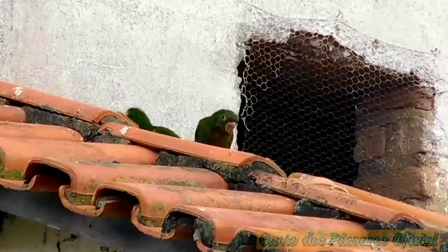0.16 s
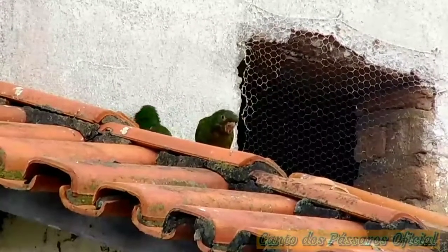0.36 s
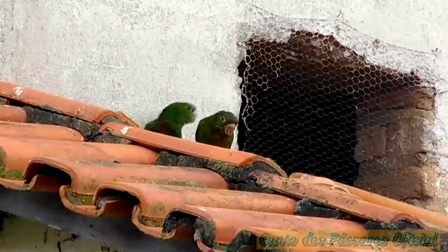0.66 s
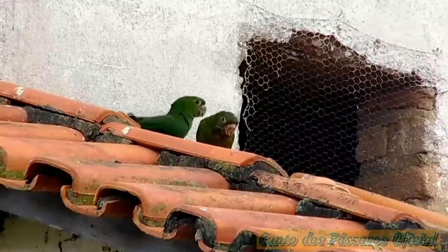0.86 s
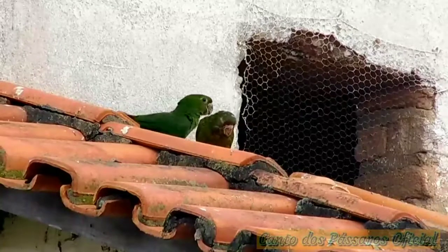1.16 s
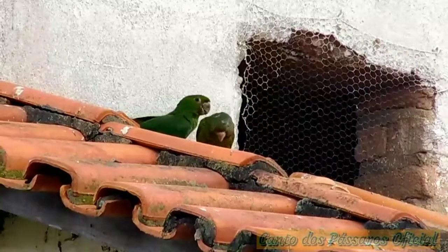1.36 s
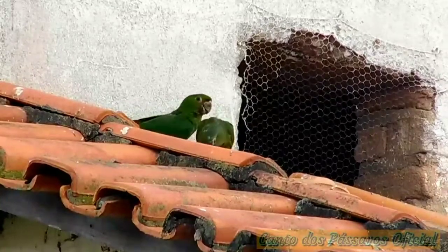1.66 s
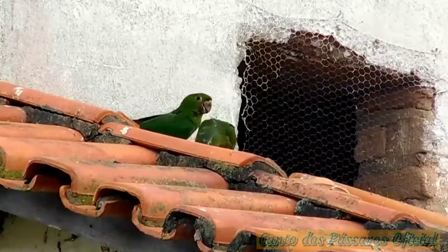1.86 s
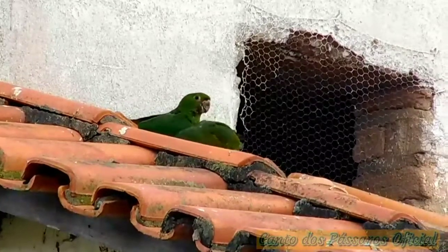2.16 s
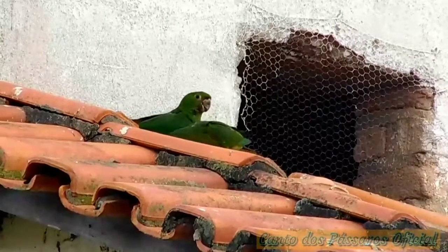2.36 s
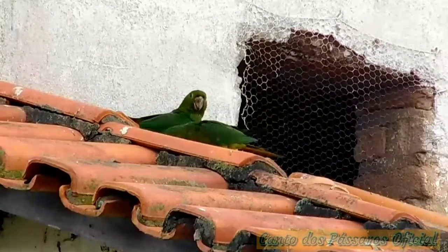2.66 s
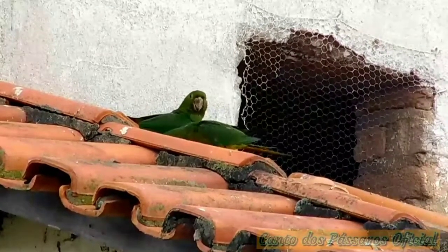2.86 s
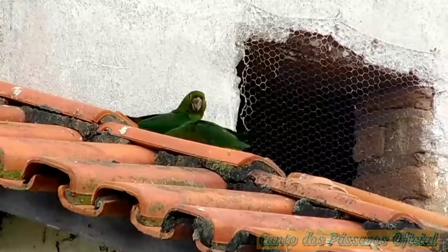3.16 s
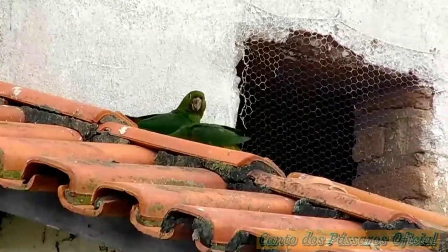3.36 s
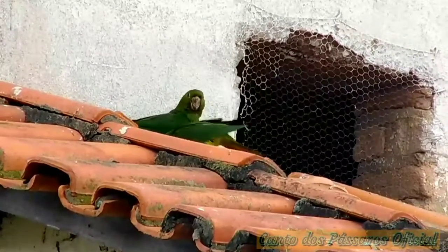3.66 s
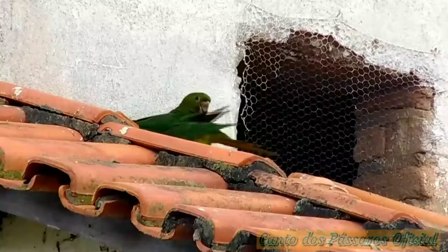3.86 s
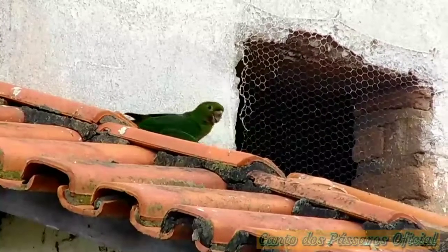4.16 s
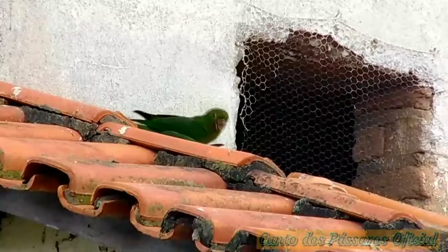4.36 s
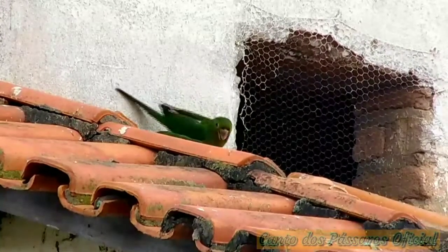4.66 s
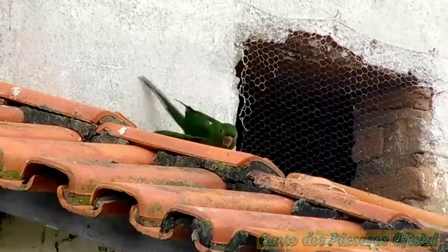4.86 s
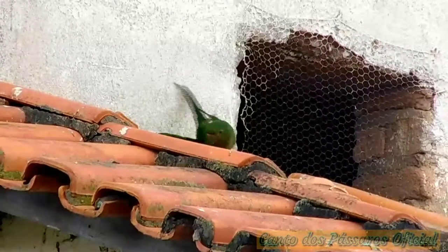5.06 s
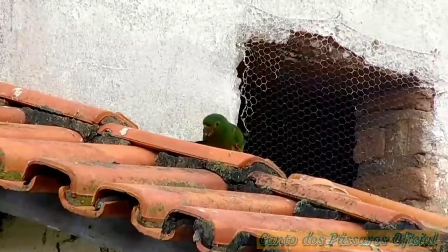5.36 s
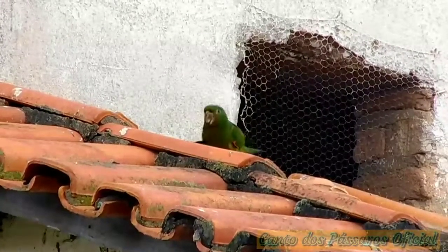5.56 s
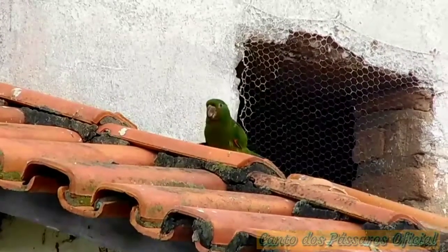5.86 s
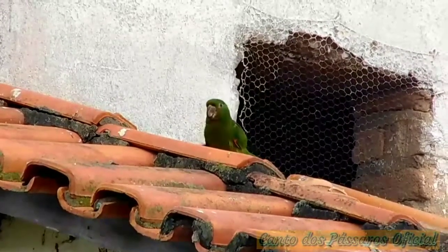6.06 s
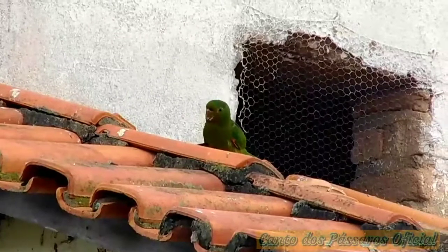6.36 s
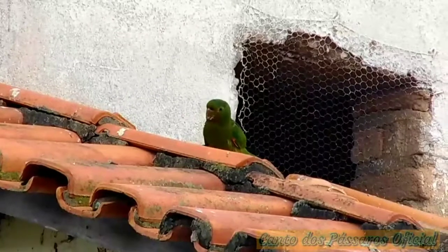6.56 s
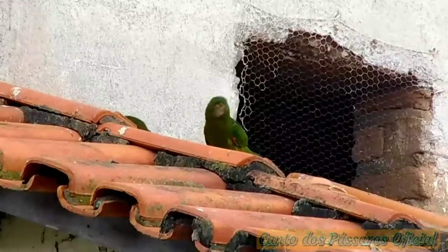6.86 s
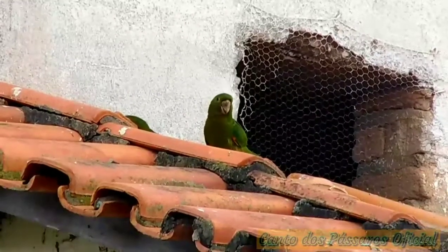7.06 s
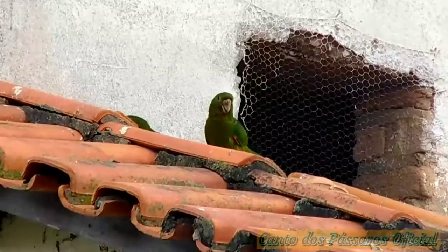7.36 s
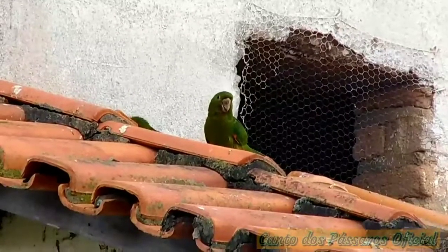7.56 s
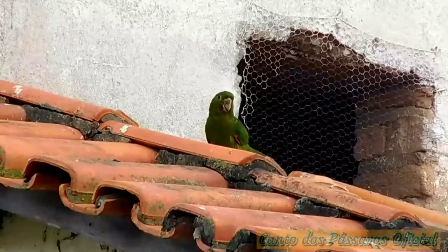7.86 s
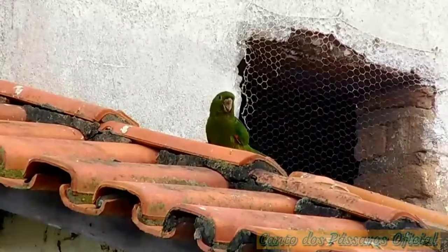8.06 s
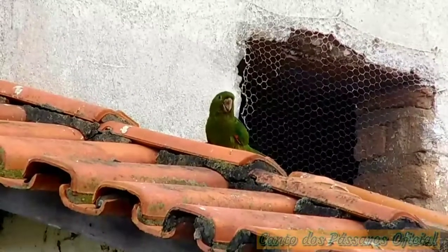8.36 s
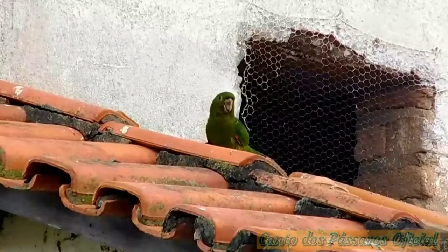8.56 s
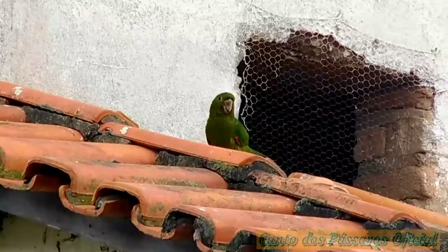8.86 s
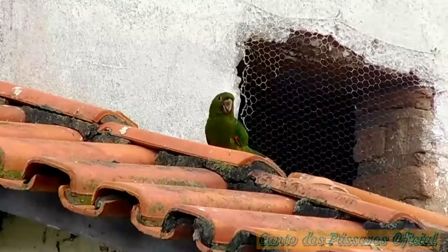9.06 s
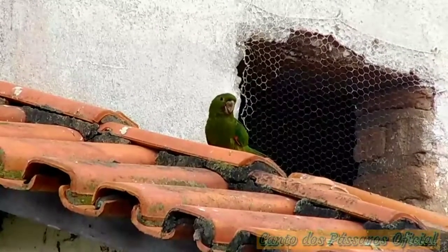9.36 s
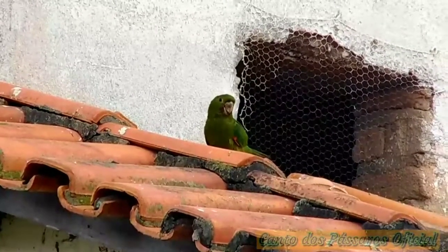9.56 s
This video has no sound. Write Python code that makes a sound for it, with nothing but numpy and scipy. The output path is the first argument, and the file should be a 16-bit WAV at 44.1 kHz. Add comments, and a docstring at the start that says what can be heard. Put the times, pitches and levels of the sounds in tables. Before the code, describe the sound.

Two parakeets squabble outdoors on a roof, slightly to the right of the microphone. A brief screech opens, then a pause reveals faint chirps from a small bird and four distant hammer blows on metal. A long bout of rapid squawks, rasps, squeals and thin whistles follows, and one last short screech comes after a gap. Walls add a light echo over a low town hum.

```python
"""Parakeets squabbling on a roof

Two parakeets screech in quick bouts, a little to the right; roof tiles and yard walls answer.
The voice flips between a gliding squawk, a rattling rasp, a falling squeal and a thin whistle.
Squawks and rasps are brighter the louder they are, and the throat's resonances rise with the pitch.
Far off, over the hum of a town, a small bird chirps and someone hammers on metal."""
import sys
import numpy as np
from scipy import signal
from scipy.fft import rfft, irfft, next_fast_len
from scipy.io import wavfile
from scipy.ndimage import map_coordinates

SR = 44100
rng = np.random.default_rng(int(sys.argv[2]) if len(sys.argv) > 2 else 0)


def dump(signal):
    """Clip the signal to [-1, 1] and save it as 16-bit WAV at the path in sys.argv[1]."""
    limited = np.clip(np.atleast_2d(signal).T, -1, 1)
    pcm = np.round(limited * 32767).astype(np.int16)
    wavfile.write(sys.argv[1], SR, pcm)


N = 428211
TOP_HZ = 14500
USUAL_DB, USUAL_HZ = -16, 710  # an ordinary low note
SQUAWK_ROUGH, RASP_ROUGH, SQUEAL_ROUGH, WHISTLE_ROUGH = .31, .62, .37, .3  # 0 clean, 1 all noise


def amp(db):
    """Decibels to gain."""
    return 10 ** (np.asarray(db) / 20)


def unit(x):
    """x at rms 1."""
    return x / np.sqrt(np.mean(x ** 2) + 1e-20)


def along(points, hz):
    """An EQ curve: (frequency, value) points read on a log axis."""
    f, v = np.transpose(points)
    return np.interp(np.log(hz + 1), np.log(f + 1), v)


def over_time(points, s):
    """An automation curve: (time, value) points joined by straight lines."""
    return np.interp(s, *np.transpose(points))


def wobble(rate, size):
    """A smooth random curve with rate knots a second."""
    return map_coordinates(rng.standard_normal(size // 10), [np.arange(size) * rate / SR], mode="mirror")


def filtered(x, response):
    """x through a filter whose gain is response(Hz)."""
    size = x.shape[-1]
    m = next_fast_len(2 * size)
    return irfft(rfft(x, m) * response(np.fft.rfftfreq(m, 1 / SR)), m)[..., :size]


def causal(db):
    """The minimum-phase response with these levels: it rings after a pulse, never before."""
    cepstrum = irfft(np.log(amp(db)))
    half = len(cepstrum) // 2
    return np.exp(rfft(np.r_[cepstrum[0], 2 * cepstrum[1:half]], 2 * half))


def add(track, s, x):
    """Mix x into the track at time s."""
    part = track[..., max(round(s * SR), 0):][..., :x.shape[-1]]
    part += x[..., :part.shape[-1]]


def panned(x, left_db, lead_s=0):
    """Make a stereo sound left_db(Hz) louder, and lead_s earlier, on the left."""
    sign = np.array([[.5], [-.5]])
    return filtered(x, lambda hz: amp(sign * left_db(hz)) * np.exp(2j * np.pi * hz * sign * lead_s))


# tone of the town bed: (frequency [Hz], gain [dB])
TOWN_EQ = [(25, -3.5), (180, 0), (560, -9), (850, -6), (4000, -19), (14000, -29.5)]
def town(level_db=-42.5):
    """A steady hum, nearly mono in the bass and wide in the treble."""
    mid, side = filtered(rng.standard_normal((2, N)), lambda hz: amp(along(TOWN_EQ, hz)))
    side = filtered(side, lambda hz: amp(along([(150, -13), (3000, -2)], hz)))
    return amp(level_db) * unit(np.array([mid + side, mid - side]))


# fader ride on the traffic: (time [s], level [dB])
TRAFFIC_FADER = [(0, -47), (1, -59), (6.3, -62), (7.7, -46), (9.7, -45.5)]
def traffic(corner_hz=170, side_db=-12):
    """Far traffic rumbles in the bass, sinking away early and swelling toward the end."""
    mid, side = filtered(rng.standard_normal((2, N)), lambda hz: 1 / (1 + (hz / corner_hz) ** 2))
    side *= amp(side_db)
    level_db = over_time(TRAFFIC_FADER, np.arange(N) / SR)
    return amp(level_db) * unit(np.array([mid + side, mid - side]))


# formants of a parakeet's throat and open beak: (frequency [Hz], gain [dB])
THROAT_EQ = [(450, -37.5), (750, -12), (1100, -17.5), (1650, -2.5), (2250, -4.5), (2850, 8.5), (3500, 1),
             (4200, 1.5), (5400, -7.5), (6700, -2.5), (9300, -22), (11000, -18), (12500, -26),
             (14000, -30.5)]
def dying_echo(level_db=-32, t60=1.0):
    """A fading wash in the throat's colour: the tail of an earlier screech hangs in the yard."""
    wash = unit(filtered(rng.standard_normal((2, N)), lambda hz: amp(along(THROAT_EQ, hz))))
    return wash * amp(level_db - 60 * np.arange(N) / SR / t60)


def syllable(length, first_hz, last_hz, rough, bright_db, bend=1, overtone_db=0, stretch=1):
    """One gliding note of the syrinx, shaped by the throat; stretch shifts the formants."""
    fade_s = .005 + length / 3
    t = np.arange(int((length + fade_s) * SR)) / SR
    progress = t / t[-1]
    swell = np.sin(np.pi / 2 * np.clip(np.minimum(t, t[-1] - t) / fade_s, 0, 1)) ** 1.4
    glide = last_hz + (first_hz - last_hz) * (1 - progress) ** bend
    # a level note arches with the air pressure
    arch = .06 * np.exp(-10 * abs(np.log(first_hz / last_hz))) * (np.sin(np.pi * progress) - .7)
    tremble = .05 * rough ** 1.5 * wobble(600, len(t)) + .007 * wobble(70, len(t))
    phase = 2 * np.pi * np.cumsum(glide * (1 + arch + tremble)) / SR
    harmonics = np.arange(1, int(TOP_HZ / min(first_hz, last_hz)) + 1)[:, None]
    flutter_db = 2.5 * np.array([wobble(130, len(t)) for _ in harmonics])
    weights = amp(overtone_db * (harmonics > 1) + rng.normal(0, 1.5, harmonics.shape) + flutter_db)
    lags = rng.uniform(-np.pi / 2, np.pi / 2, harmonics.shape)  # uneven lags blunt the pulses
    pulses = unit((weights * np.cos(harmonics * phase + lags)).sum(0))
    # chaotic vibration: a puff of noise at every opening of the membranes
    puffs = unit(rng.standard_normal(len(t)) * (1 + np.cos(phase)) ** 2)
    noise_share = np.clip(rough, 0, 1) ** 1.6
    source = np.sqrt(1 - noise_share) * pulses + np.sqrt(noise_share) * puffs
    beak_eq = [(3200, 0), (6500, bright_db), (13000, 1.29 * bright_db)]  # a wider beak, more treble
    voice = filtered(source, lambda hz: causal(along(THROAT_EQ, hz / stretch) + along(beak_eq, hz)))
    # a rough voice rattles in quick, uneven beats
    rattle_hz = 210 * (1 + .3 * wobble(150, len(t)))
    rattle_db = 5 * rough * np.sin(2 * np.pi * np.cumsum(rattle_hz) / SR)
    return unit(voice * amp(rattle_db)) * swell


def add_on_tiles(track, s, length, note, t60=.05):
    """Place a note at s; the bird keeps turning its head, so the tiles scatter each note differently."""
    t = np.arange(SR // 10) / SR
    paths = rng.standard_normal((2, len(t))) * amp(-60 * t / t60)
    paths *= .9 / np.linalg.norm(paths, axis=1, keepdims=True)
    paths[:, 0] = 1  # the direct path
    add(track, s + (length - len(note) / SR) / 2, signal.fftconvolve(note[None], paths, axes=1))


# treble ride on the voice, highest at the peak of the squabble: (time [s], boost [dB])
TREBLE_RIDE = [(.3, 3), (3.6, 5.5), (4.5, 6.5), (5.1, 5), (5.6, 9), (6.1, 6), (6.5, 10), (6.8, 6),
               (8.4, 3.5)]
def low_note(s, length, first_hz, last_hz, db, rough, pitch_tracking=.56):
    """A note of the low voice: brightness follows its level, the throat its pitch."""
    bright_db = over_time(TREBLE_RIDE, s) + db - USUAL_DB
    stretch = np.clip((first_hz + last_hz) / 2 / USUAL_HZ, .9, 1.3) ** pitch_tracking
    stretch *= 1 + rng.normal(0, .02)
    return amp(db) * syllable(length, first_hz, last_hz, rough, bright_db, stretch=stretch)


# squawk cues: (time [s], length [s], start pitch [Hz], end pitch [Hz], relative level [dB])
SQUAWK_CUES = [(0.163, 0.017, 730, 753, -20), (0.317, .032, 741, 693, -18.5), (3.38, .044, 591, 595, -28),
               (3.546, .018, 615, 786, -22.5), (3.587, 0.035, 743, 615, -17.5),
               (3.907, 0.045, 754, 631, -17), (3.964, 0.02, 744, 701, -14.5), (4.004, 0.023, 727, 721, -14),
               (4.249, 0.034, 1024, 1246, -21), (4.29, 0.045, 713.4, 647, -16.5),
               (4.42, 0.045, 860, 956, -17.5), (4.504, 0.041, 801, 764, -15),
               (4.698, 0.013, 746, 732, -17.5), (4.887, 0.05, 615, 698, -17), (5.295, 0.02, 644, 711, -16),
               (5.323, 0.038, 725, 705, -15), (5.364, 0.042, 690, 624, -15), (5.452, 0.057, 705, 624, -28),
               (5.549, 0.039, 693, 800, -20.5), (5.682, 0.026, 695, 707, -15.5),
               (5.825, 0.054, 715, 769, -18.5), (5.938, .025, 746, 732, -19),
               (5.983, 0.05, 694, 809, -16.5), (6.042, 0.027, 718, 703, -14.5),
               (6.205, .03, 699, 701, -18.5), (6.367, 0.032, 600, 611, -23), (6.446, 0.031, 867, 875, -18),
               (6.529, 0.053, 728, 761, -17), (6.757, 0.023, 703, 673, -23),
               (7.012, 0.051, 613, 699, -17.5), (7.119, 0.022, 735, 725, -14),
               (7.213, 0.083, 479.6, 522.7, -25.5)]
def squawks():
    """The syrinx pulses almost evenly: a clear, nasal glide."""
    track = np.zeros((2, N))
    for s, length, first_hz, last_hz, db in SQUAWK_CUES:
        add_on_tiles(track, s, length, low_note(s, length, first_hz, last_hz, db, SQUAWK_ROUGH))
    return track


# rasp cues: (time [s], length [s], relative level [dB])
RASP_CUES = [(.19, .038, -16), (0.272, 0.02, -18.5), (3.668, 0.023, -16.5), (3.731, 0.089, -23),
             (4.068, 0.048, -18), (4.457, 0.017, -17.5), (4.584, 0.022, -15), (4.626, 0.009, -12.5),
             (4.99, 0.015, -19), (5.038, 0.0059, -15.5), (5.073, 0.0096, -17), (5.2, 0.08, -38),
             (5.728, 0.013, -14.5), (5.797, 0.023, -16.5), (5.894, .014, -16.5), (5.964, 0.017, -19),
             (6.128, 0.025, -17.5), (6.158, .04, -22.5), (6.466, .052, -18), (6.61, 0.018, -20),
             (6.637, 0.036, -17), (6.72, .012, -19.5), (6.811, .02, -22.5), (7.16, 0.029, -23),
             (8.411, 0.02, -24), (8.439, 0.03, -20), (8.514, 0.0112, -15.5)]
def rasps():
    """The low voice breaks into a rattle with no clear pitch."""
    track = np.zeros((2, N))
    for s, length, db in RASP_CUES:
        first_hz, last_hz = USUAL_HZ * (1 + rng.uniform(-.06, .1, 2))
        add_on_tiles(track, s, length, low_note(s, length, first_hz, last_hz, db, RASP_ROUGH))
    return track


# squeal cues: (time [s], length [s], start pitch [Hz], end pitch [Hz], relative level [dB])
SQUEAL_CUES = [(0.225, 0.024, 1777, 1790, -19.5), (0.299, 0.02, 2140, 1580, -22.5),
               (3.566, 0.019, 1755, 1480, -15.5), (3.631, 0.029, 1700, 1700, -20.5),
               (3.991, 0.014, 2026, 1595, -14), (4.472, 0.028, 2380, 2270, -18.5),
               (4.611, .016, 1910, 1540, -15.5), (4.632, 0.028, 1763, 1723, -19.5),
               (4.952, 0.053, 1792, 1540, -19), (5.05, 0.025, 1760, 1590, -18),
               (5.609, 0.024, 2380, 1776, -20.5), (5.712, 0.019, 1980, 1627, -14.5),
               (5.741, .025, 1794, 1770, -17.5), (5.87, 0.024, 1708, 1736, -16),
               (6.099, 0.019, 2184, 1890, -20), (7.082, 0.045, 2020, 1684, -16.5),
               (8.466, 0.03, 1884, 1806, -23), (8.548, 0.059, 1940, 1634, -16)]
def squeals(extra_treble_db=1):
    """The voice flips into a high register, rich in overtones and mostly falling."""
    track = np.zeros((2, N))
    for s, length, first_hz, last_hz, db in SQUEAL_CUES:
        bright_db = over_time(TREBLE_RIDE, s) + extra_treble_db
        note = syllable(length, first_hz, last_hz, SQUEAL_ROUGH, bright_db, bend=1.7, overtone_db=5.5)
        add_on_tiles(track, s, length, amp(db) * note)
    return track


# chirp cues: (time [s], centre pitch [Hz], rise [share of pitch], relative level [dB])
CHIRP_CUES = [(.73, 5560, 0.046, -44), (.8, 4460, .2, -47), (1.012, 4000, 0.293, -46),
              (1.58, 5000, .03, -50)]
def small_bird(length=.04):
    """A distant bird gives short, pure upward chirps."""
    track, progress = np.zeros(N), np.linspace(0, 1, int(length * SR))
    for s, hz, rise, db in CHIRP_CUES:
        phase = 2 * np.pi * np.cumsum(hz * (1 + rise * (progress - .5))) / SR
        add(track, s, amp(db) * np.sin(np.pi * progress) * np.sin(phase))
    return track


# hammer hits: (time [s], relative level [dB])
HAMMER_HITS = [(1.47, -60), (1.91, -55), (2.415, -53), (2.965, -49.5)]
# ring of the struck metal: (frequency [Hz], gain [dB], t60 [s])
METAL_MODES = [(866, 18, 0.23), (1555, 21, 0.06)]
def hammer(waver_rad=.36):
    """Each blow rings the metal anew; the tones waver a little on their long way."""
    track, t = np.zeros(N), np.arange(SR // 2) / SR
    for s, db in HAMMER_HITS:
        for hz, mode_db, t60 in METAL_MODES:
            phase = 2 * np.pi * hz * t + waver_rad * wobble(125, len(t))
            add(track, s, amp(db + mode_db - 60 * t / t60) * np.sin(phase))
    return track


# whistle cues: (time [s], length [s], centre pitch [Hz], relative level [dB])
WHISTLE_CUES = [(3.698, 0.026, 2600, -21.5), (4.032, 0.025, 2660, -15.5), (4.662, 0.028, 2830, -15.5),
                (4.721, 0.015, 2697, -18), (5.024, 0.011, 2788, -13.5), (5.409, .036, 2744, -20),
                (5.583, 0.025, 2970, -26), (5.769, 0.031, 2884, -13), (5.914, 0.015, 2965, -14),
                (6.08, 0.023, 2902, -12), (7.069, 0.008, 2997, -14), (8.525, .015, 3010, -9),
                (8.622, 0.014, 2610, -22.5)]
def whistles(droop=.033):
    """The parakeet's top register: a thin, sinking tone with weak overtones."""
    track = np.zeros((2, N))
    for s, length, hz, db in WHISTLE_CUES:
        first_hz, last_hz = hz * (1 + droop), hz * (1 - droop)
        note = syllable(length, first_hz, last_hz, WHISTLE_ROUGH, bright_db=9, overtone_db=-8)
        add_on_tiles(track, s, length, amp(db) * note)
    return track


def second_parakeet(from_s=4.05, to_s=6.85, count=34, length=.06, pitch_hz=850, level_db=-29):
    """The other bird keeps up a softer, hoarse chatter through the long bout."""
    track = np.zeros((2, N))
    for s, (late, high, glide) in zip(np.linspace(from_s, to_s, count), rng.uniform(-1, 1, (count, 3))):
        hz = pitch_hz * (1 + .3 * high)
        note = syllable(length, hz, hz * (1 + .3 * glide), RASP_ROUGH, bright_db=1)
        add_on_tiles(track, s + length * (late / 2 - 1) / 2, length, amp(level_db) * note)
    return track


# reverb time of the yard: (frequency [Hz], t60 [s])
YARD_DECAY = [(3000, 0.74), (12000, 0.56)]
def yard_reverb(x, predelay_s=.01):
    """The walls scatter reflections, different at each ear; the treble dies first."""
    hz, t, noise = signal.stft(rng.standard_normal((2, SR)), SR, nperseg=256)
    tail = signal.istft(noise * amp(-60 * t / along(YARD_DECAY, hz)[:, None]), SR)[1]
    tail /= np.linalg.norm(tail, axis=1, keepdims=True)
    delayed = np.pad(x, (int(predelay_s * SR), 0))
    return signal.fftconvolve(delayed[None], tail, axes=1)[:, :N]


# rightward pan of birds, hammer and yard: (frequency [Hz], left minus right [dB])
PAN_CURVE = [(700, -3), (3000, -3), (8000, -2.5), (13000, -6)]
def scene(near_bird_db=-3.5, reverb_send_db=-6.5):
    """The birds sit a little to the right; distant sounds come mostly by way of the yard."""
    near_bird = amp(near_bird_db) * (squawks() + rasps() + squeals() + whistles())
    parakeets = near_bird + second_parakeet()
    far = hammer() + small_bird()
    reverb = yard_reverb(amp(reverb_send_db) * parakeets.mean(0) + far)
    bed = panned(town() + traffic(), left_db=lambda hz: -1, lead_s=-78e-6)
    yard = parakeets + reverb + dying_echo() + far / 2
    return panned(yard, left_db=lambda hz: along(PAN_CURVE, hz)) + bed


def record(dry):
    """A brick-wall low-pass on the whole mix."""
    return filtered(dry, lambda hz: hz < TOP_HZ)


dry = scene()
out = record(dry)
dump(out)
```